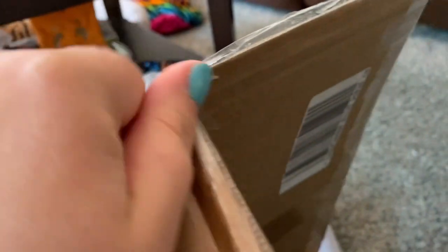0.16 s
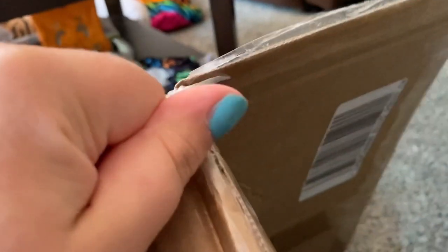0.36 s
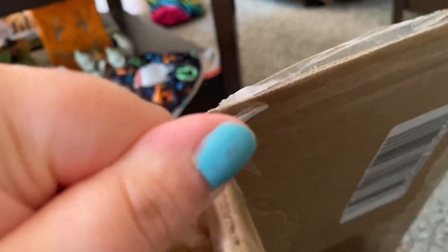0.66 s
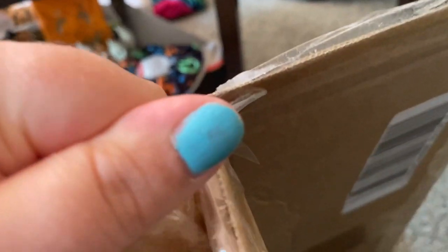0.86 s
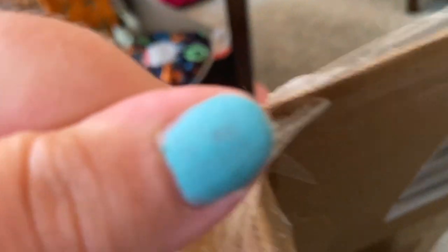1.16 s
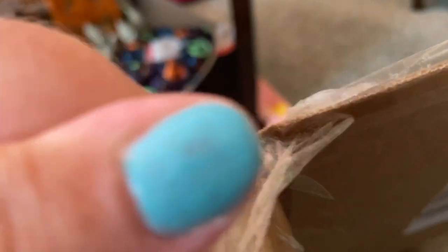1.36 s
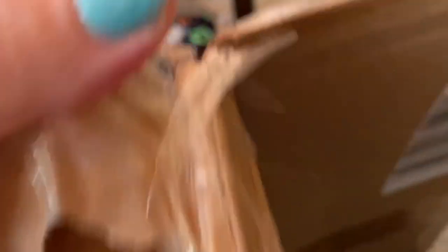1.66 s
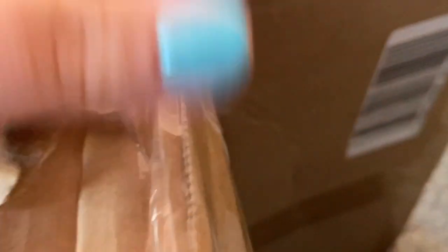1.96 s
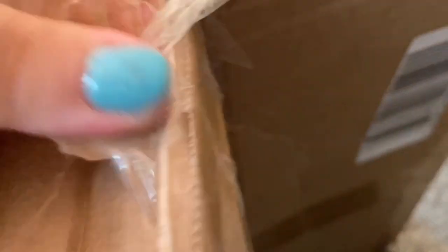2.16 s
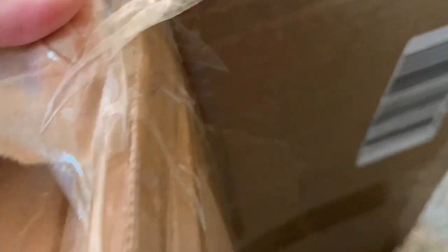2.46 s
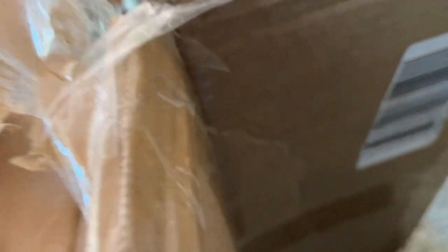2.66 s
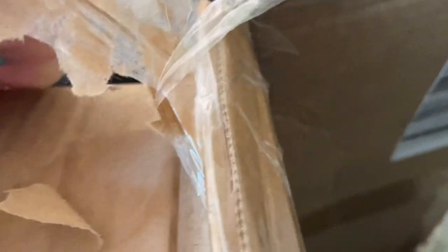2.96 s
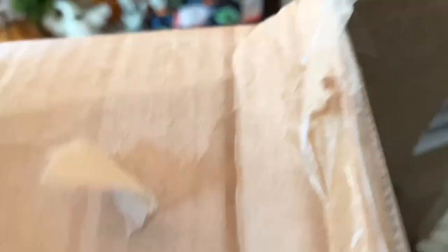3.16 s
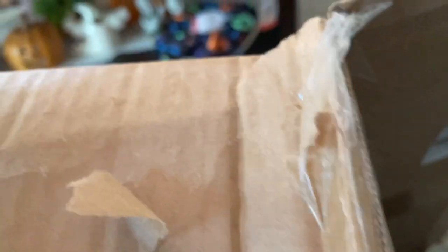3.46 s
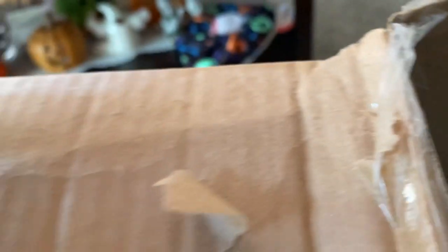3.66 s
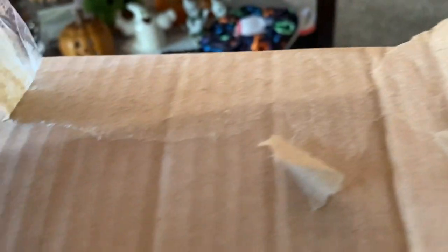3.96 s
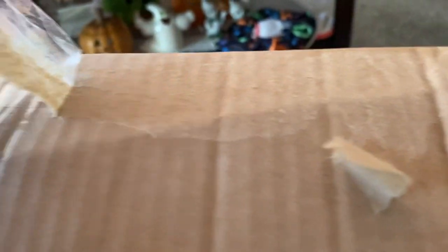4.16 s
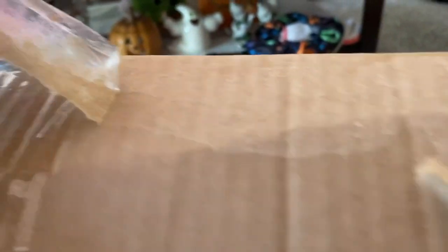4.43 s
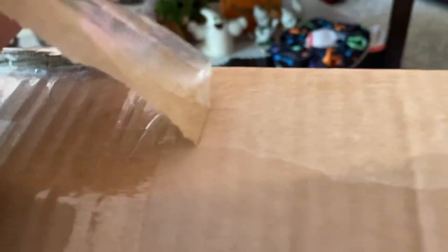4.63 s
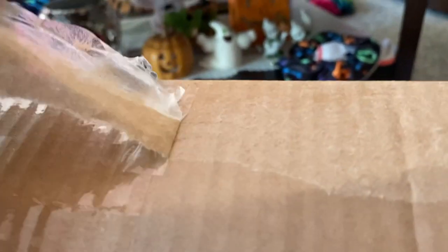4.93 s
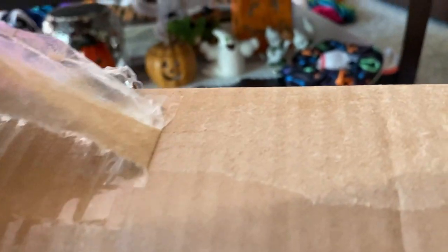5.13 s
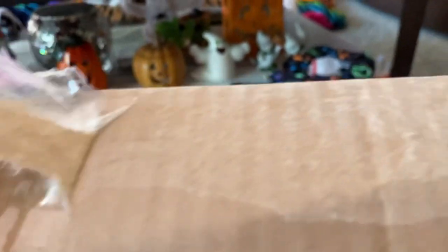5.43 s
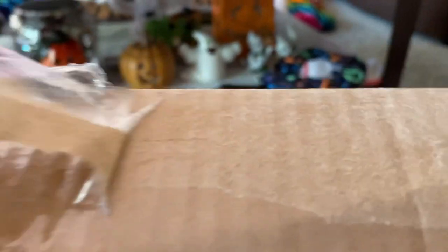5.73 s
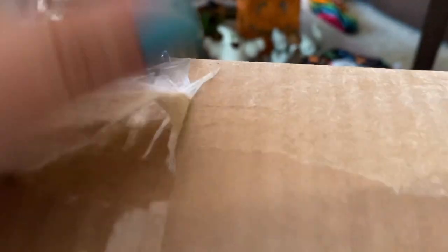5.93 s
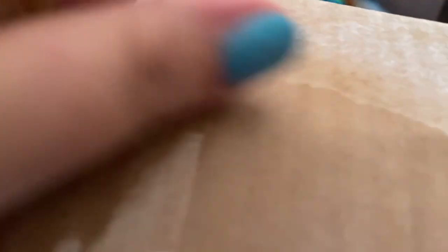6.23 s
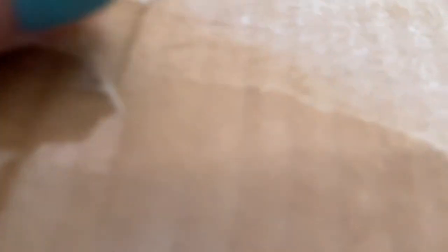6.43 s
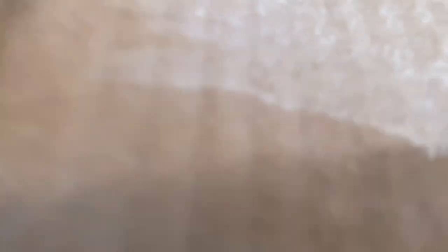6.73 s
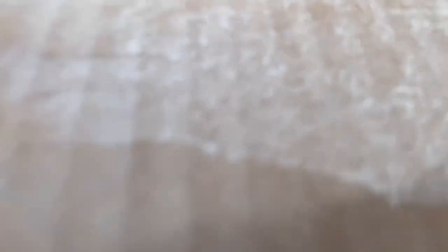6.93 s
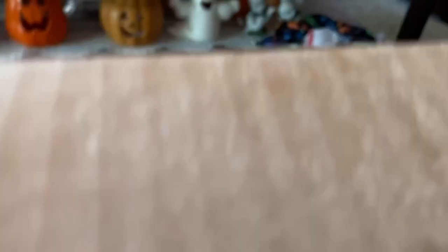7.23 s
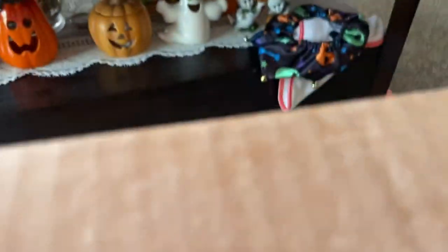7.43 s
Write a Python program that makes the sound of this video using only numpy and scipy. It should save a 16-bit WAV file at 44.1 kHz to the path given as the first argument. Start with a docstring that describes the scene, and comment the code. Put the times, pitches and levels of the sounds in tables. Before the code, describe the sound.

Fingernails peel packing tape from a cardboard box in a quiet carpeted room. Rapid jerky rasps, crackling fibres, sharp film snaps and dull box knocks crowd the first three seconds. Then the pulling becomes faint, with sparse crinkles and soft bumps, until a loud cluster of snaps and a booming jerk near the end. Very close handheld stereo pickup.

```python
"""Fingernails pick at packing tape on a cardboard box and peel it off in rasping tears, close up.
Glue and fibres let go as dense clumped cracks, made of random impulses that drive tape, board and panel.
Noise bursts make the film snap and tick, falling sine waves make the walls knock, slow swells make them boom.
A low hush of coloured noise is all the carpeted room adds; a hand-held recorder takes it in stereo."""
import sys
import numpy as np
from scipy import signal
from scipy.fft import rfft, irfft, next_fast_len
from scipy.io import wavfile
from scipy.ndimage import uniform_filter1d

SR = 44100
rng = np.random.default_rng(int(sys.argv[2]) if len(sys.argv) > 2 else 0)


def master(y):
    """Save y as 16-bit WAV."""
    cut = np.clip(np.atleast_2d(y).T, -1, 1)
    pcm = np.round(cut * 32767)  # scale
    wavfile.write(sys.argv[1], SR, pcm.astype(np.int16))


N = 334563  # length in samples

# All levels in dB are balances inside the mix, ahead of the final trims and the recorder.
# Tone of the room hush. Each row: frequency in Hz, relative level in dB.
HUSH_TONE = [(25, -6), (70, 10.5), (380, 11.5), (700, -26.5), (16000, -35.5)]
HUSH_DB = -59
# Strokes of the pull. Each row: start in seconds, length in seconds, rasp at the start in dB,
# rasp at the end in dB, jerkiness (0 even, 1 clumped).
TEAR_STROKES = [(0, 0.14, -22.5, -28.5, 0.066), (.15, 0.11, -30, -22, 0.36), (0.363, 0.1, -31, -27, 1.05),
                (0.518, 0.17, -26, -29, 1.04), (0.792, 0.086, -32.5, -18.5, 1.01),
                (0.923, 0.083, -25.5, -23.5, 1.26), (1.123, 0.11, -35.5, -31.5, 1.04),
                (1.371, 0.15, -31.5, -38, 1.38), (2.095, 0.064, -22, -30, 0.98),
                (2.191, 0.07, -32.5, -33.5, 1.48), (2.543, 0.011, -19, -20.5, 0.99),
                (2.593, 0.004, -26, -21, 0.36), (2.644, 0.22, -33, -47.5, 1.17),
                (2.849, 0.11, -26.5, -44.5, 0.84), (3.058, 0.071, -21, -28.5, 0.76),
                (4.17, 0.082, -47, -46, 1.4), (4.657, 0.11, -50, -35.5, 0.42),
                (4.77, 0.1, -34.5, -39.5, 0.7), (5.179, 0.03, -45.5, -36.5, 0.62),
                (5.263, 0.17, -45, -47, 0.89), (6.223, 0.03, -40, -34, 0.9), (6.318, 0.26, -44.5, -36.5, 1),
                (6.684, 0.045, -24.5, -30.5, 0.72), (7.278, 0.17, -38.5, -36, 0.93)]
GRIP_DB_PER_S, LET_GO_DB_PER_S = 1201, 495  # build before a stroke starts, fall after it ends
# Weak crackle between the rips. Each row: time in seconds, level in dB.
CRACKLE_LEVEL = [(0, -46), (.34, -30.5), (.73, -46.5), (1.05, -40.5), (1.54, -37.5), (1.61, -66),
                 (1.65, -40), (1.95, -45), (2.35, -52.5), (2.95, -46), (3.2, -60), (3.95, -66), (4.1, -52),
                 (4.43, -57), (4.51, -74), (4.63, -72), (5.04, -50.5), (5.52, -60.5), (5.9, -50),
                 (6.25, -48), (6.65, -58), (6.91, -49), (7.1, -57.5), (7.27, -43), (7.59, -47)]
CRACKLE_JERKINESS = 1
# What is tearing. Each row: time in seconds, film fizz against the pull in dB,
# cardboard against the pull in dB.
TORN_MATERIAL = [(0, 2, -2), (.5, -9, -7), (.9, 3.5, 5.5), (1.5, 2, -2), (2.1, -2.5, 5), (2.85, 5, -3),
                 (3.1, -1.5, 2), (4.2, 4.5, 2), (6.95, 6, 1.5), (7.3, -10, -5), (7.59, 6.5, -0.5)]
# Tone of the tape's rasp. Each row: frequency in Hz, relative level in dB.
RASP_TONE = [(1000, -14.5), (1600, -3.5), (2500, 3.5), (3600, 0.5), (7000, -5), (10000, -15.5)]
# Tone of the crinkling film. Each row: frequency in Hz, relative level in dB.
FIZZ_TONE = [(5000, -28.5), (8000, -7.5), (16000, -3.5)]
# Tone of the bending cardboard. Each row: frequency in Hz, relative level in dB.
CARD_TONE = [(120, -11), (250, 0.5), (750, -2.5), (1300, -2.5), (2400, -24.5), (5000, -48)]
# Tone of the whole booming panel. Each row: frequency in Hz, relative level in dB.
BOOM_TONE = [(25, -31), (55, 2.5), (120, 3), (200, -9.5), (450, -17.5), (1500, -65.5)]
# Low boom apart from the bumps. Each row: time in seconds, level against the pull in dB.
BOOM_LEVEL = [(0, -18.5), (1.2, -6), (1.45, -19.5), (1.8, -2.5), (2.9, -8), (3.4, 8.5), (5.0, 5.5),
              (6.2, -0.5), (7.0, 13), (7.59, 0)]
# Bumps that make the box boom. Each row: time of the peak in seconds, level in dB.
BOX_THUMPS = [(1.032, -25.5), (2.138, -20), (2.87, -27.5), (3.086, -24), (4.859, -22.5), (5.211, -25),
              (5.288, -25), (5.919, -23.5), (6.26, -25), (6.718, -15), (7.48, -28)]
THUMP_RISE_DB_PER_S, THUMP_FALL_DB_PER_S = 593.5, 403
# Small random snaps: mean rate, level against the pull at jerkiness 1, spread, range of pitches.
TICKS_PER_S, TICK_DB, TICK_SPREAD_DB = 80, 13, 5
TICK_LOW_HZ, TICK_HIGH_HZ = 1530, 13000
# Snaps of the film. Each row: start in seconds, peak level in dB, centre frequency in Hz.
FILM_SNAPS = [(0.2857, -25, 3000), (0.372, -7.5, 2790), (0.393, -18, 2340), (0.414, -15, 2250),
              (0.4385, -18, 2580), (0.4455, -3.5, 3500), (0.462, -19, 3500), (0.517, -9, 2400),
              (0.5278, -14, 3600), (0.5405, -14.5, 3480), (0.5907, -3.5, 3200), (0.746, -15.5, 2600),
              (0.9306, -8.5, 1680), (1.0075, -5, 2500), (1.061, -5, 4100), (1.195, -36, 6060),
              (1.2275, -17, 6000), (1.3065, -15.5, 2500), (1.3365, -28, 1810), (1.4727, -11, 2870),
              (1.6253, -20, 3050), (1.7074, -16, 1840), (1.729, -13.5, 1990), (1.8971, -13, 2180),
              (1.961, -35, 2000), (1.9818, -7, 1860), (2.0165, -10, 2670), (2.1035, -6, 2350),
              (2.2124, -13, 1940), (2.4074, -13.5, 2090), (2.483, -22, 6700), (2.5307, -8, 1840),
              (2.836, -18, 11700), (2.8526, -5, 2170), (3.025, -11, 11900), (3.0577, -5.5, 1910),
              (3.4083, -19, 4400), (3.707, -31.5, 4020), (4.0118, -16, 10200), (4.115, -20, 1470),
              (4.180, -24, 2600), (4.2854, -12.5, 11300), (4.352, -25, 7540), (4.655, -35, 2630),
              (5.036, -26.5, 6230), (5.271, -7, 10600), (5.288, -15.5, 3000), (5.3924, -21, 7120),
              (5.582, -30.5, 2470), (5.686, -21, 11000), (5.875, -15, 11800), (5.9986, -21, 11000),
              (6.118, -20, 6230), (6.3938, -11.5, 11300), (6.4596, -9.5, 2200), (6.5307, -7.5, 3470),
              (6.5726, -7.5, 11700), (6.6262, -13.5, 3200), (6.6816, -2.5, 7100), (6.8155, -11.5, 10800),
              (6.898, -11, 5500), (7.001, -15.5, 10000), (7.1482, -13.5, 6740), (7.289, -10.5, 2040),
              (7.4495, -21.5, 2530)]
SNAP_T60_S, SNAP_TAIL_T60_S, SNAP_TAIL_DB = 0.004, 0.02, -10  # 60 dB decay times; tail at its fullest
# Knocks of the box wall. Each row: start in seconds, peak level in dB, 60 dB decay time in seconds.
WALL_KNOCKS = [(.395, -12.5, 0.023), (0.416, -13.5, 0.021), (0.439, -13.5, 0.031), (0.595, -12, 0.066),
               (0.882, -9, 0.04), (0.932, -11.5, 0.027), (1.02, -25.5, 0.059), (1.77, -24.5, 0.097),
               (1.802, -21, 0.038), (1.897, -25, 0.095), (2.129, -8.5, 0.081), (2.541, -8, 0.028),
               (2.57, -4.5, 0.035), (3.057, -6.5, 0.072), (4.117, -26, 0.15), (6.573, -11.5, 0.1),
               (6.627, -25.5, 0.078), (6.68, -5.5, 0.16)]
# The glide starts KNOCK_GLIDE_HZ above the floor when the decay time is KNOCK_PITCH_T60_S.
KNOCK_GLIDE_HZ, KNOCK_FLOOR_HZ, KNOCK_FALL_S = 1147, 58.3, 0.00171
KNOCK_PITCH_T60_S, KNOCK_PITCH_POWER = 0.03, 0.35
EDGE_S, EDGE_DB = 0.00602, -8  # typical delay and level of the wave back from the panel edge
# Right channel against left. Each row: frequency in Hz, level in dB, phase lead in radians,
# scattered share of the power from 0 to 1.
RIGHT_CHANNEL = [(60, -1.5, 0.67, 0.05), (403, -6, -1.65, 0.28), (790, -17.5, -3, 1), (1577, -4, -4, 0.1),
                 (2205, -0.5, -7, 0.07), (3240, -6, -7.5, 0.02), (5670, -4, -5, 0.28),
                 (7060, -1.5, -6, 0.05), (17030, 0.8, 9, 0.1)]
CUTOFF_HZ = 17000  # fully cut from here up


def from_db(db):
    """Turns decibels into an amplitude factor."""
    return 10 ** (np.asarray(db) / 20)


def rms_one(x):
    """Scales a signal to rms 1."""
    return x / np.sqrt(np.mean(x ** 2) + 1e-20)


def colour(x, tone, lag_cycles=0):
    """Shapes a signal by a (Hz, dB) table and lets each pitch arrive so many of its cycles late; rms 1."""
    size = next_fast_len(N + 8192)
    hz, db = np.transpose(tone)
    log_hz = np.log(np.fft.rfftfreq(size, 1 / SR) + 1)
    gain = from_db(np.interp(log_hz, np.log(hz), db, db[0] - 21))
    lag = np.exp(-2j * np.pi * lag_cycles * log_hz)
    return rms_one(irfft(rfft(x, size) * gain * lag, size)[:N])


def drift(rate_hz):
    """Random wander: noise twice through a one-pole low-pass; spread 1."""
    pole = np.exp(-2 * np.pi * rate_hz / SR)
    noise = rng.standard_normal(N + 4000)
    return rms_one(signal.lfilter([1], [1, -2 * pole, pole * pole], noise)[4000:])


def in_time(rows):
    """Draws each column of a table as a curve over the scene, straight between its rows."""
    s, *columns = np.transpose(rows)
    return [np.interp(np.arange(N) / SR, s, column) for column in columns]


def loudest(rows, rise_db_per_s, fall_db_per_s):
    """Each row ramps from its first level to its last, with steady slopes on both sides; the loudest wins."""
    t = np.arange(N) / SR
    top_db, winner = np.full(N, -120.), np.zeros(N, int)
    for k, (s, length, first_db, last_db) in enumerate(rows):
        held = np.interp(t, [s, s + length], [first_db, last_db])
        before = rise_db_per_s * np.maximum(s - t, 0)
        after = fall_db_per_s * np.maximum(t - s - length, 0)
        db = held - before - after
        winner[db > top_db] = k
        top_db = np.maximum(top_db, db)
    return top_db, winner


def room_hush():
    """The carpeted room leaves a steady low hush of coloured noise."""
    return from_db(HUSH_DB) * colour(rng.standard_normal(N), HUSH_TONE)


def pull():
    """Force of the pull in dB and its jerkiness; whichever is louder, rip or crackle, sets both."""
    crackle_db, = in_time(CRACKLE_LEVEL)
    strokes = np.array(TEAR_STROKES)
    tear_db, which = loudest(strokes[:, :-1], GRIP_DB_PER_S, LET_GO_DB_PER_S)
    tear_jerky = np.clip(strokes[which, -1], 0, 2)
    jerky = np.where(tear_db > crackle_db, tear_jerky, CRACKLE_JERKINESS)
    return np.maximum(crackle_db, tear_db), jerky


def tearing(jerky, per_s, spread_db, slow_db, fast_db, hiss):
    """Fibres break at random with uneven force, over a bed of hiss; a second curve gathers them in clumps."""
    clumps = from_db(jerky * (slow_db * drift(28) + fast_db * drift(160)))
    clumps /= np.sqrt(uniform_filter1d(clumps ** 2, size=8000))  # the pull sets the overall force
    strength = from_db(spread_db * np.minimum(rng.exponential(1, N), 5))
    sizes = strength * rng.choice([-1, 1], N)
    cracks = rms_one(sizes * (rng.random(N) < per_s / SR))
    return clumps, rms_one(cracks + hiss * rng.standard_normal(N))


def panel_boom(cracks, pull_db):
    """The heavy panel booms with the pull and the bumps, and evens the cracks out."""
    share_db, = in_time(BOOM_LEVEL)
    bumps = [(s, 0, db, db) for s, db in BOX_THUMPS]
    thump_db, _ = loudest(bumps, THUMP_RISE_DB_PER_S, THUMP_FALL_DB_PER_S)
    boom_db = np.maximum(pull_db + share_db, thump_db)
    boom = colour(cracks, BOOM_TONE)
    evened = boom / np.sqrt(uniform_filter1d(boom ** 2, size=2000))
    return from_db(boom_db - 2.5) * evened


def peel(pull_db, jerky):
    """One train of cracks drives the tape, the cardboard and the whole panel."""
    fizz_db, card_db = in_time(TORN_MATERIAL)
    clumps, cracks = tearing(jerky, per_s=6000, spread_db=4.0, slow_db=2.2, fast_db=2.2, hiss=0.59)
    force = from_db(pull_db) * rms_one(clumps * cracks)
    level = np.sqrt(np.mean(from_db(pull_db) ** 2))
    rasp = from_db(2.8 * drift(27)) * colour(force, RASP_TONE)
    # the film crinkles a little on its own
    film = from_db(fizz_db + 5.0 * jerky * drift(50)) * colour(force, FIZZ_TONE)
    # bending waves in the board: low pitches travel slower, so every crack falls in pitch
    bent = colour(force * rng.choice([-1, 1], N), CARD_TONE, lag_cycles=2.8)
    card = from_db(card_db + 4.6 * jerky * drift(36)) * bent
    return from_db(-4.0) * level * (rasp + film + card) + panel_boom(cracks, pull_db)


def ticks(pull_db, jerky):
    """The glue line slips in small random snaps of random pitch; a jerky pull makes them stand out."""
    at = np.flatnonzero(rng.random(N) < TICKS_PER_S / SR)
    size = np.clip(rng.standard_normal(len(at)), -2, 2)
    db = pull_db[at] + TICK_DB * jerky[at] + TICK_SPREAD_DB * size
    hz = TICK_LOW_HZ * (TICK_HIGH_HZ / TICK_LOW_HZ) ** rng.random(len(at))
    return snaps(np.transpose([at / SR, db, hz]))


def snaps(rows):
    """Each snap is a sharp crack of noise with a short tail, broad around its own pitch."""
    out, t = np.zeros(N + 1024), np.arange(1024) / SR
    noise = rng.standard_normal((len(rows), 1024))
    tail_share = rng.random((len(rows), 1))  # some end dry, some rasp on
    crack = from_db(-60 * t / SNAP_T60_S)
    tail = from_db(SNAP_TAIL_DB - 60 * t / SNAP_TAIL_T60_S)
    for (s, db, hz), puff in zip(rows, noise * (crack + tail_share * tail)):
        wide = signal.butter(1, [hz / 2.02, min(hz * 1.59, 18000)], "band", fs=SR)
        burst = signal.lfilter(*wide, puff)
        i = round(s * SR)
        out[i:i + 1024] += from_db(db) * burst / np.abs(burst).max()
    return out[:N]


def knocks():
    """A hard jerk sends one strong bending wave through the wall, falling in pitch."""
    out, t = np.zeros(N + 8192), np.arange(8192) / SR
    bends = rng.uniform(0.9, 1.08, (len(WALL_KNOCKS), 2))
    for (s, db, t60), (slack, turn) in zip(WALL_KNOCKS, bends):
        t60 = max(t60, .01)
        # a wider panel rings longer and lower
        glide_hz = KNOCK_GLIDE_HZ * (KNOCK_PITCH_T60_S / t60) ** KNOCK_PITCH_POWER
        hz = KNOCK_FLOOR_HZ + glide_hz / (1 + t / (slack * KNOCK_FALL_S))
        swell = (1 - np.exp(-t / 0.0002)) * from_db(-60 * t / t60)
        cycles = np.cumsum(hz) / SR + turn
        wave = from_db(db) * swell / swell.max() * np.sin(2 * np.pi * cycles)
        # the wave comes back from the edge of the panel
        echo = from_db(EDGE_DB) * np.interp(t - EDGE_S * turn ** 2, t, wave, 0)
        i = round(s * SR)
        out[i:i + 8192] += wave + echo
    return out[:N]


def two_channels(x):
    """The right channel hears the same sound coloured and shifted, partly scattered by hands and box."""
    size = next_fast_len(N + 4096)
    grid = np.fft.rfftfreq(size, 1 / SR)
    hz, *columns = np.transpose(RIGHT_CHANNEL)
    db, lead, share = [np.interp(grid, hz, column) for column in columns]
    share = np.clip(share, 0, 1)
    spectrum = rfft(x, size)
    quarter_turned = irfft(1j * spectrum, size)[:N]
    # the phase of the scattered path wanders as the hands move
    turn = np.pi * drift(6)
    scattered = rfft(x * np.cos(turn) + quarter_turned * np.sin(turn), size)
    mixed = np.sqrt(1 - share) * spectrum + np.sqrt(share) * scattered
    right = from_db(db) * np.exp(1j * lead) * mixed
    return np.array([x, irfft(right, size)[:N]])


def scene():
    """Lays the peeling, ticks, snaps and knocks over the hush and spreads them to two channels."""
    hush = room_hush()
    pull_db, jerky = pull()
    tape = peel(pull_db, jerky) + ticks(pull_db, jerky) + snaps(FILM_SNAPS) + knocks()
    return two_channels(from_db(3.0) * tape + hush)


def record(dry):
    """Peaks are rounded; the top steps down near 16 kHz and is then cut."""
    rounded = 1.175 * np.tanh(dry / 1.063)
    step = signal.ellip(6, .5, 16, 15750, fs=SR, output="sos")
    cut = signal.cheby2(24, 90, CUTOFF_HZ, fs=SR, output="sos")
    return signal.sosfilt(np.vstack([step, cut]), rounded)


dry = scene()
out = record(dry)
master(out)
```